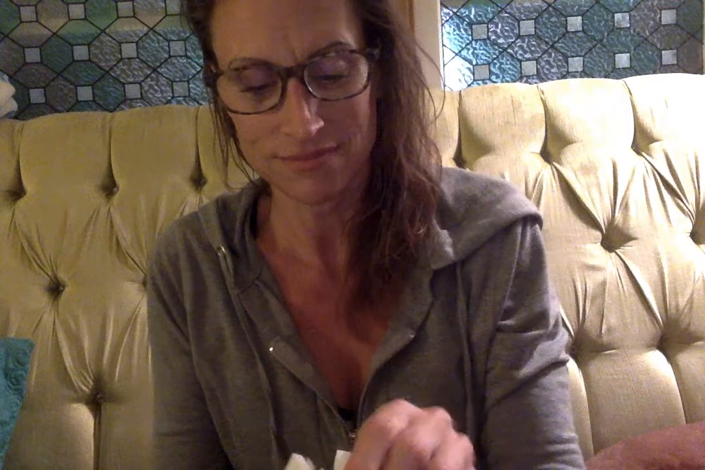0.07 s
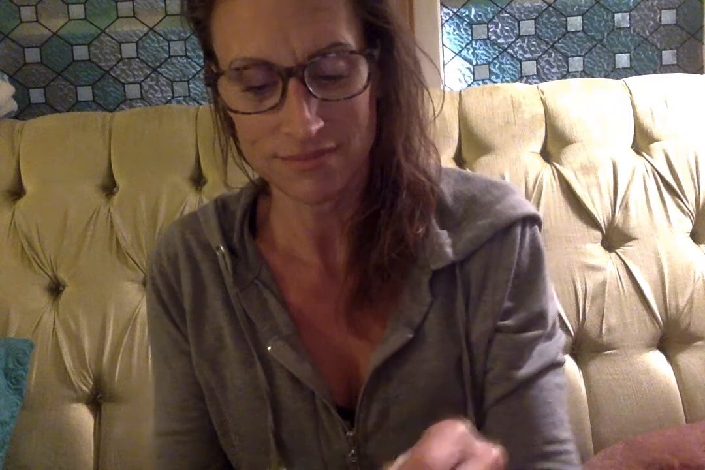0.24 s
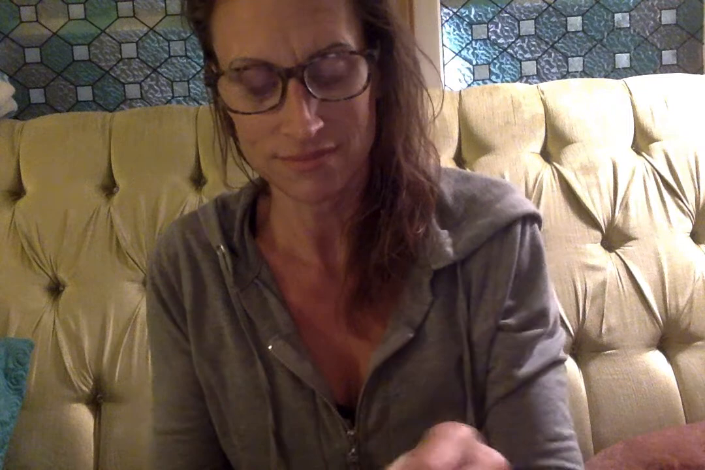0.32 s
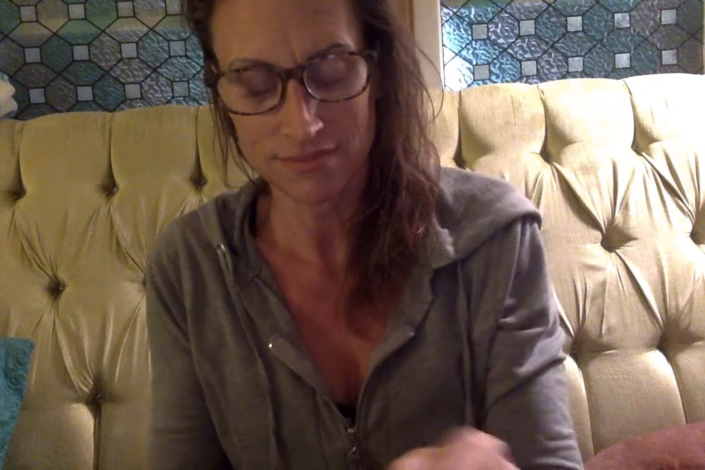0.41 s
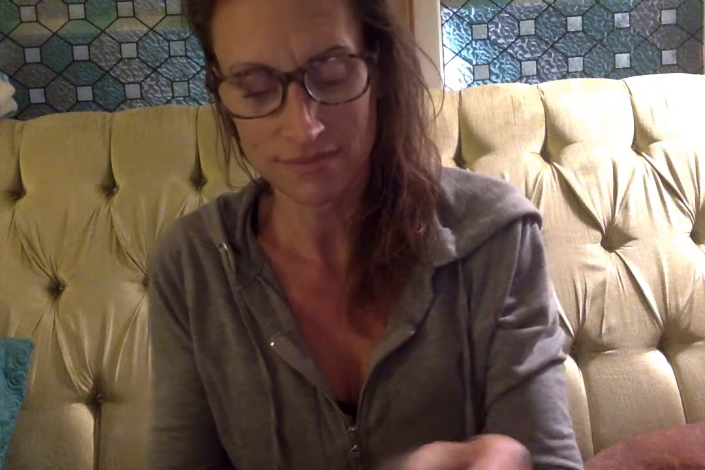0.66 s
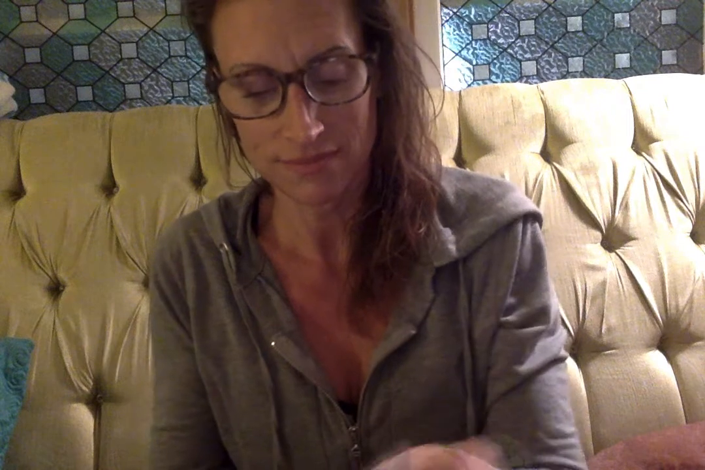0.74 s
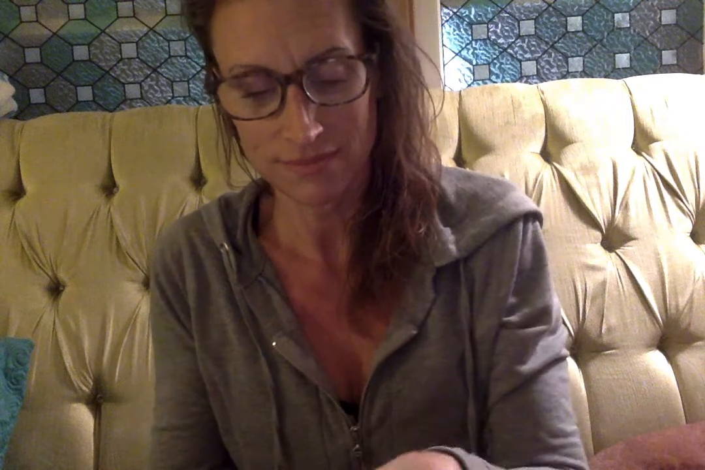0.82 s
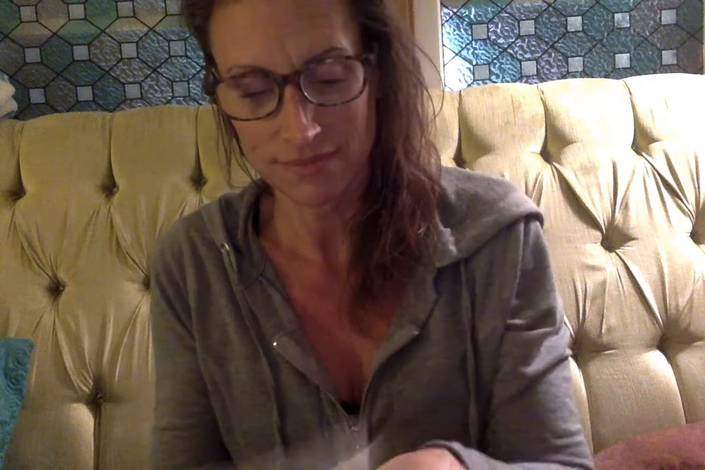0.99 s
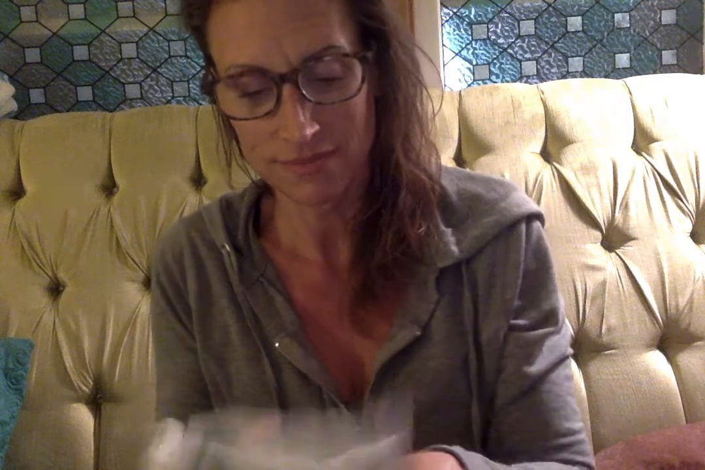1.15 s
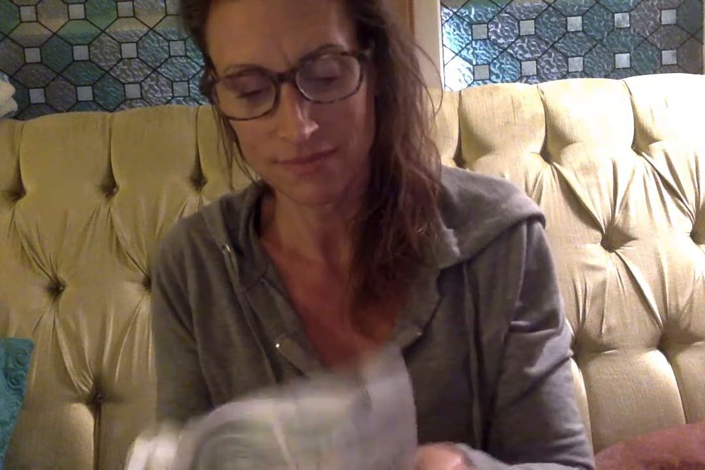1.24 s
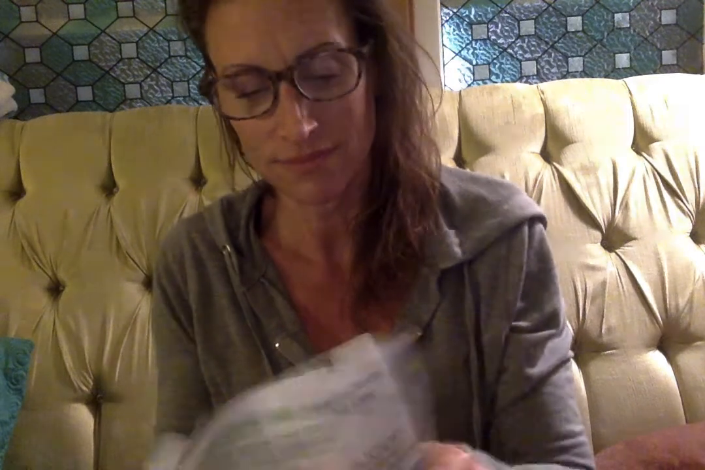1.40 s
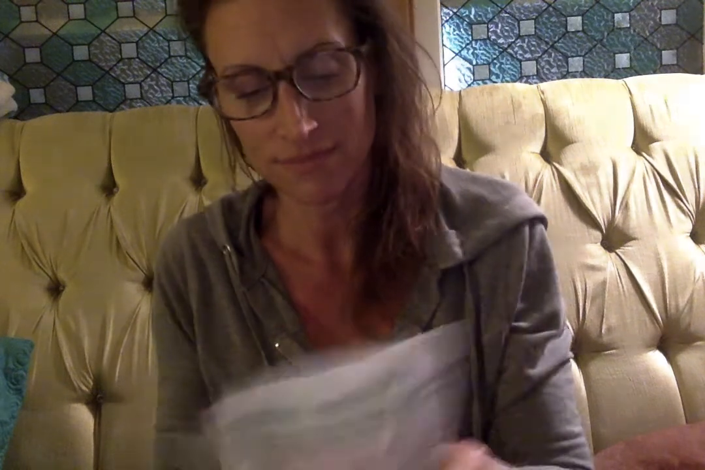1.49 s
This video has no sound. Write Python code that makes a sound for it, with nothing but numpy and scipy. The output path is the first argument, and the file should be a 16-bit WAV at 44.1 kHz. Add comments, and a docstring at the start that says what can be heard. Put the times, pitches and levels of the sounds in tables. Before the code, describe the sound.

Paper crackles and slides as a leaflet is unfolded, followed by light rustling in a quiet room.

```python
"""A sharp crack and a papery slide: a folded leaflet is pulled open in a small, quiet living room.
The fold gives, the leaves rub apart, then creases buckle one by one as the sheet is turned and lifted.
Each buckle rings a small panel of paper for a few cycles; catching fibres make the rustle and hiss.
Fingers and sheet bump softly, and a faint low hum fills the room."""
import sys
import numpy as np
from scipy import signal
from scipy.fft import rfft, irfft
from scipy.io import wavfile

SR = 44100
rng = np.random.default_rng(int(sys.argv[2]) if len(sys.argv) > 2 else 0)


def master(y):
    """Save y as 16-bit WAV."""
    cut = np.clip(np.atleast_2d(y).T, -1, 1)
    pcm = np.round(cut * 32767)  # scale
    wavfile.write(sys.argv[1], SR, pcm.astype(np.int16))


N = 68355
T = np.arange(N) / SR
TOP_HZ = 15900


def from_db(db):
    """Decibels to gain."""
    return 10 ** (np.asarray(db) / 20)


def unit_rms(x):
    """Scale to rms 1."""
    return x / np.sqrt(np.mean(x ** 2) + 1e-20)


def burst_level(x, level_db, window_s=0.004):
    """Give a burst the energy of level_db held for window_s."""
    return from_db(level_db) * x * np.sqrt(window_s * SR / (np.sum(x ** 2) + 1e-20))


def butter(x, hz, kind, order):
    """Butterworth filter."""
    return signal.sosfilt(signal.butter(order, hz, kind, fs=SR, output="sos"), x)


def resonate(x, hz, width_hz):
    """Two-pole resonance, peak gain 1."""
    radius = np.exp(-np.pi * width_hz / SR)
    zeros = np.array([1, 0, -1]) * (1 - radius ** 2) / 2
    poles = [1, -2 * radius * np.cos(2 * np.pi * hz / SR), radius ** 2]
    return signal.lfilter(zeros, poles, x)


def colour(x, spectrum):
    """Shape x by (freq_hz, gain_db) points; rms 1."""
    freq_hz, gain_db = np.transpose(spectrum)
    bins_hz = np.maximum(np.fft.rfftfreq(N, 1 / SR), 1)
    gain = from_db(np.interp(np.log(bins_hz), np.log(freq_hz), gain_db))
    return unit_rms(irfft(rfft(x) * gain, N))


def envelope(time_s, level_db):
    """Gain through the points, zero outside them."""
    return from_db(np.interp(T, time_s, level_db)) * (T > time_s[0]) * (T < time_s[-1])


def add(out, start_s, x):
    """Mix x in at start_s."""
    i = int(start_s * SR)
    out[i:i + len(x)] += x[:N - i]


def diffuse_tail(x, t60_s, onset_s=None):
    """Convolve with decaying noise of unit energy, optionally faded in."""
    t = T[:SR // 2]
    tail = rng.standard_normal(len(t)) * from_db(-60 * t / t60_s)
    if onset_s:
        tail *= 1 - np.exp(-t / onset_s)
    return signal.fftconvolve(x, tail / np.sqrt(np.sum(tail ** 2)))[:N]


def room_hum(pitch_hz=111, width_hz=14, level_db=-71.5):
    """Wavering low hum: a narrow band of noise."""
    noise = rng.standard_normal(N + SR)  # 1 s extra to settle
    hum = resonate(resonate(noise, pitch_hz, width_hz), pitch_hz, width_hz)[SR:]
    return from_db(level_db) * unit_rms(hum)


# Still-room spectrum: freq_hz, gain_db
AIR_SPECTRUM = [(20, -12.5), (55, -8.5), (80, -4), (110, -0.5), (150, -6.5), (195, -2), (280, -2.5),
                (335, -1), (450, -3.5), (720, -9), (850, -2), (1300, -12.5), (2600, -8), (4000, -13.5),
                (7000, -24), (10000, -28.5), (16000, -23.5)]
def room_air(level_db=-66.5):
    """Soft, steady room noise."""
    return from_db(level_db) * colour(rng.standard_normal(N), AIR_SPECTRUM)


def room_reverb(x, split_hz=7500, onset_s=0.011, gain_db=-14.5):
    """Short diffuse tail that dies sooner in the treble."""
    low = butter(diffuse_tail(x, t60_s=0.26, onset_s=onset_s), split_hz, "low", order=4)
    treble = butter(diffuse_tail(x, t60_s=0.18, onset_s=onset_s), split_hz, "high", order=4)
    return from_db(gain_db) * (low + treble)


# Mode clusters of the open sheet: centre_hz, width_hz, gain_db
MODE_CLUSTERS = [(2300, 200, -20), (4080, 790, -22.5)]
def sheet_ring(x):
    """Close modes linger after the paper is disturbed."""
    lingering = diffuse_tail(x, t60_s=0.48)
    return sum(from_db(db) * resonate(lingering, hz, width_hz) for hz, width_hz, db in MODE_CLUSTERS)


# Bumps of fingers and sheet: start_s, pitch_hz, level_db, decay_s
SHEET_BUMPS = [(.0098, 627, -46, .0014), (0.0105, 1255, -48, .0016), (.221, 815, -40.5, 0.0013),
               (.222, 260, -51, .006), (.238, 430, -34.5, .014), (0.244, 125, -47, .015),
               (.304, 330, -40.5, .011)]
def bumps(band_ratio=1.55):
    """Dull, quickly damped flaps of the whole sheet."""
    out, t = np.zeros(N), T[:SR // 10]
    for start_s, pitch_hz, level_db, decay_s in SHEET_BUMPS:
        push = rng.standard_normal(len(t)) * np.exp(-t / decay_s)
        flap = butter(push, [pitch_hz / band_ratio, pitch_hz * band_ratio], "band", order=3)
        add(out, start_s, burst_level(flap, level_db))
    return out


def fibres(clicks_per_s=12000, spread_db=3):
    """Dense, uneven clicks of paper fibres catching and letting go."""
    size_db = spread_db * np.minimum(rng.exponential(1, N), 5)
    polarity = rng.choice([-1, 1], N)
    catches = rng.random(N) < clicks_per_s / SR
    return from_db(size_db) * polarity * catches


# Resonance of the sliding leaf: time_s, level_db
SINGING_LEVELS = [(.225, -49), (0.244, -42), (.285, -38.5), (.315, -67), (.345, -50.5), (.40, -54),
                  (.43, -67)]
def singing_leaf(pitch_hz=2900, width_hz=520):
    """Catching fibres keep one resonance of the sliding leaf going."""
    time_s, level_db = np.transpose(SINGING_LEVELS)
    tone = resonate(resonate(fibres(), pitch_hz, width_hz), pitch_hz, width_hz)
    return envelope(time_s, level_db) * unit_rms(tone)


# Leaves sliding apart; sheet turned and lifted: time_s, rustle_db, hiss_db
SLIDE_LEVELS = [(.221, -86, -84), (.229, -23, -34.5), (.241, -27.5, -28), (.257, -35.5, -38),
                (.29, -42, -46), (.318, -37.5, -46.5), (.34, -43, -47.5), (.37, -49.5, -59.5),
                (.405, -58, -83.5), (.43, -81.5, -94.5)]
TURN_LEVELS = [(.722, -76.5, -76.5), (.742, -57.5, -73), (.761, -49.5, -58.5), (.772, -61, -74),
               (.80, -51.5, -50), (.85, -83.5, -75.5), (1.148, -97.5, -91), (1.162, -54.5, -58),
               (1.178, -60, -79), (1.208, -55.5, -70), (1.222, -48, -48), (1.24, -48, -70),
               (1.28, -53.5, -83), (1.32, -54, -88), (1.38, -58, -80), (1.415, -52.5, -59),
               (1.44, -47, -60.5), (1.465, -61.5, -96), (1.52, -81, -85.5)]
# Spectra of the two rustles and their hiss: freq_hz, gain_db
SLIDE_SPECTRUM = [(100, -28), (450, -15.5), (700, -25.5), (950, -2.5), (1200, -17), (2300, -6), (2900, 0),
                  (3700, -6.5), (5200, -19), (6300, -4), (7100, -23), (16000, -46)]
TURN_SPECTRUM = [(200, -11), (1200, -19), (1650, -5), (2300, 1.5), (3050, -5), (4200, 2), (5200, -10),
                 (6200, -7.5), (7200, -41), (16000, -29)]
HISS_SPECTRUM = [(3000, -47.5), (7200, -8), (8400, 7.5), (9300, -11), (10500, 5), (13000, 1), (15300, 4.5),
                 (16500, -9.5)]
def rubbing():
    """Paper on paper: catching fibres sound the sheet and hiss above it."""
    out = np.zeros(N)
    for levels, spectrum in ((SLIDE_LEVELS, SLIDE_SPECTRUM), (TURN_LEVELS, TURN_SPECTRUM)):
        time_s, rustle_db, hiss_db = np.transpose(levels)
        out += envelope(time_s, rustle_db) * colour(fibres(), spectrum)
        out += envelope(time_s, hiss_db) * colour(fibres(), HISS_SPECTRUM)
    return out


# Buckling creases: start_s, panel_hz, panel_q, ring_db, crack_db, flex_db, run_s
BUCKLES = [(0.1223, 2630, 13, -48.5, -92, -62, 0.0036), (0.22, 3430, 2.07, -12, -15.5, -34, 0.0043),
           (0.2314, 4000, 4.3, -21.5, -34, -38, 0.00061), (0.237, 4030, 9, -21, -47, -39.5, .0005),
           (0.2486, 4100, 2.2, -23, -34, -33, 0.0003), (0.3056, 5940, 1, -27, -32.5, -46, 0.00063),
           (0.325, 3430, 3.4, -28.5, -31.5, -37.5, 0.0021), (0.3574, 2960, 2.9, -31.5, -69, -41.5, 0.00039),
           (0.4215, 4200, 4.1, -33, -37, -51, 0.00034), (0.519, 6100, 9, -56.5, -75, -72.5, 0.00087),
           (0.653, 2050, 13, -55, -88, -64.5, 0.0012), (0.7265, 3580, 3.7, -37, -61, -60.5, 0.003),
           (.7338, 3700, 6, -46.5, -69, -69, .0008), (0.7794, 3000, 6.8, -50.5, -80, -56.5, 0.001),
           (0.788, 3980, 1.42, -29, -38.5, -51.5, 0.001), (1.1548, 3900, 11, -50.5, -62, -72, .0022),
           (1.219, 2880, 2.2, -38, -50.5, -59, 0.0012), (1.247, 2340, 21, -36.5, -61, -63, 0.008),
           (1.2658, 2340, 2.2, -40, -78, -58.5, 0.0044), (1.296, 2310, 2.8, -36, -65, -71, 0.0026),
           (1.2998, 4070, 7, -34.5, -52, -53.5, 0.0015), (1.3034, 3100, 0.84, -35, -56.5, -51, 0.00033),
           (1.3283, 2460, 13, -42.5, -76, -70, 0.0054), (1.3551, 3820, 2.4, -37.5, -44, -57.5, 0.00077),
           (1.3864, 3150, 1.9, -33.5, -63.5, -42.5, 0.00024),
           (1.397, 4030, 4.8, -29.5, -40.5, -56, 0.00027), (1.4024, 3900, 1.4, -36, -63, -49, 0.0021),
           (1.4061, 4500, 2, -41, -44.5, -49.5, 0.0048), (1.429, 2300, 8.7, -34.5, -56, -58, 0.004),
           (1.4306, 4220, 12, -36, -51, -49, 0.00086)]
def buckling_creases(first_slip_gain=6.0, after_db=-4.5, after_decay_s=0.0017):
    """One big slip and a run of small ones ring a panel, crack in the treble and flex the sheet."""
    out, t = np.zeros(N), T[:SR // 40]
    for start_s, panel_hz, panel_q, ring_db, crack_db, flex_db, run_s in BUCKLES:
        run = np.exp(-(t / run_s) ** 1.8)
        after = from_db(after_db) * np.exp(-t / after_decay_s)
        slips = rng.standard_normal(len(t)) * (run + after)
        slips[0] += first_slip_gain
        width_hz = panel_hz / panel_q
        ring = resonate(slips, panel_hz, width_hz)
        ring = resonate(ring, panel_hz, 5 * width_hz)  # radiates only near its pitch
        ring = butter(ring, 1500, "high", order=4)
        ring = butter(ring, 7050, "low", order=8)
        crack = butter(slips, 7600, "high", order=3)
        crack = butter(crack, TOP_HZ, "low", order=6)
        flex = butter(slips, [970, 2003], "band", order=3)
        for part, level_db in ((ring, ring_db), (crack, crack_db), (flex, flex_db)):
            add(out, start_s, burst_level(part, level_db))
    return out


def scene():
    """The leaflet close to the microphone, in the room; mono."""
    paper = buckling_creases() + bumps() + singing_leaf() + rubbing()
    return (paper + sheet_ring(paper) + room_reverb(paper) + room_hum() + room_air())[None]


def record(dry, ceiling=0.65, dip_depth=0.94):
    """Small microphone: loudest crack rounded off, little bass, a treble dip, a steep top cut."""
    x = ceiling * np.tanh(dry / ceiling)
    x = butter(x, 80, "high", order=3)
    x = x - dip_depth * resonate(x, hz=6990, width_hz=200)
    return signal.sosfilt(signal.ellip(10, 0.2, 80, TOP_HZ, fs=SR, output="sos"), x)


dry = scene()
out = record(dry)
master(out)
```